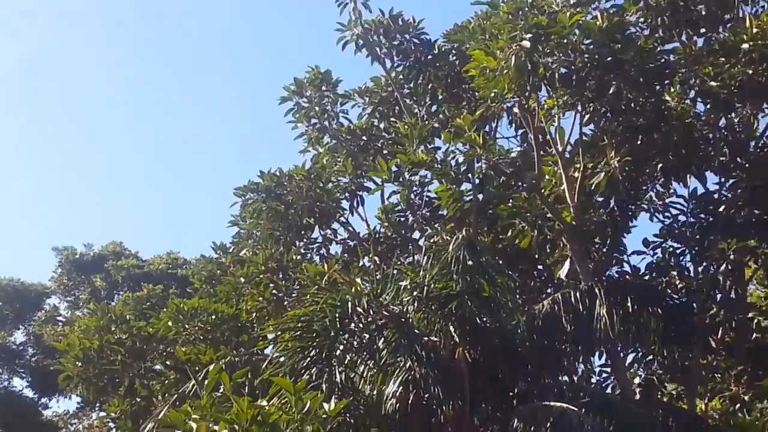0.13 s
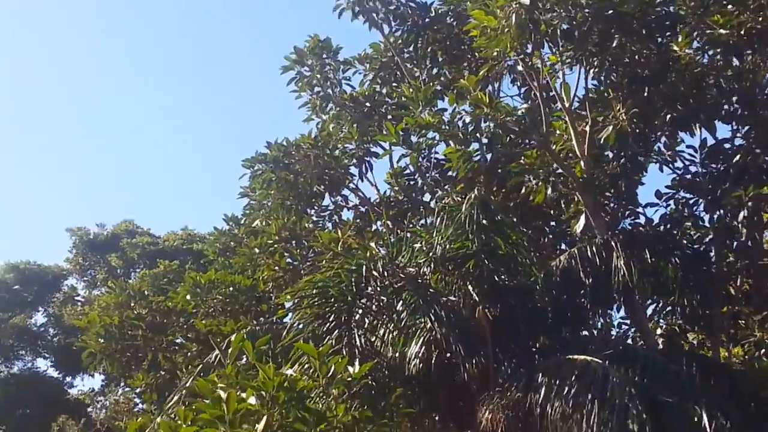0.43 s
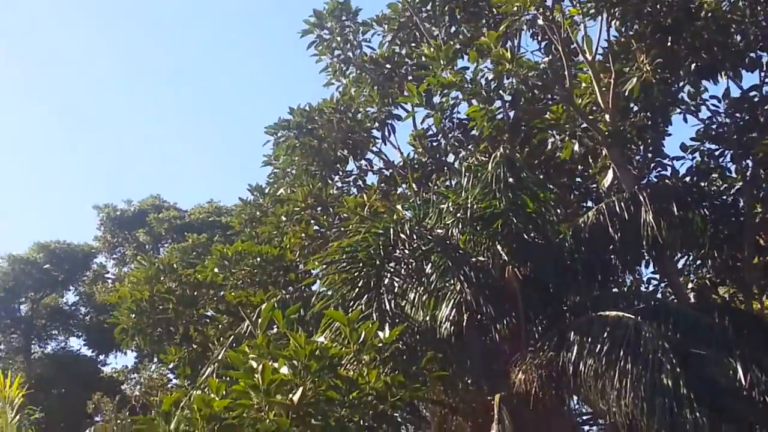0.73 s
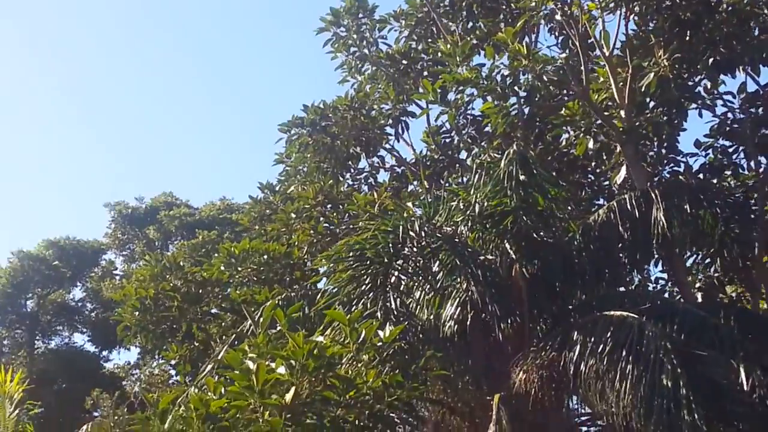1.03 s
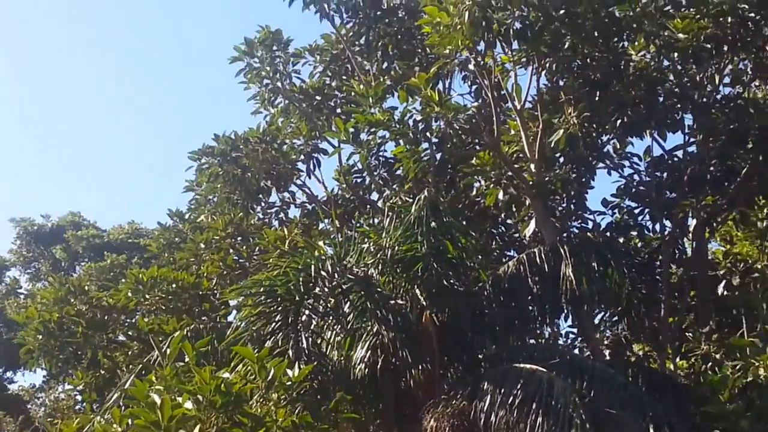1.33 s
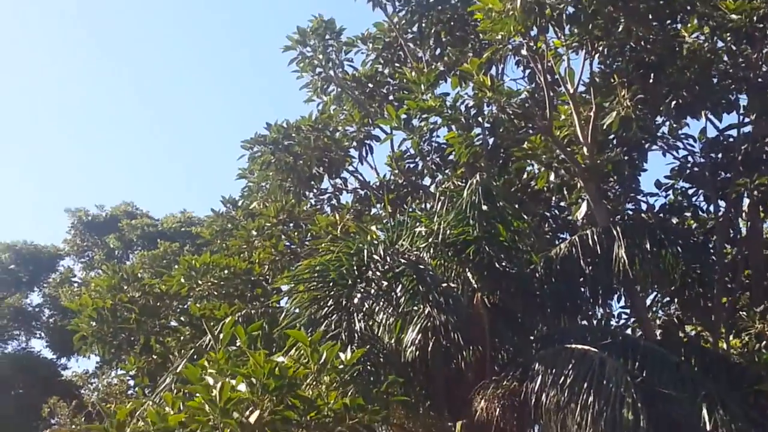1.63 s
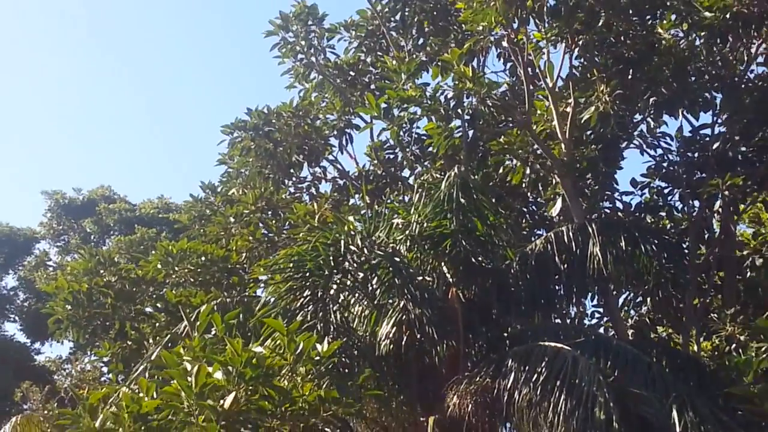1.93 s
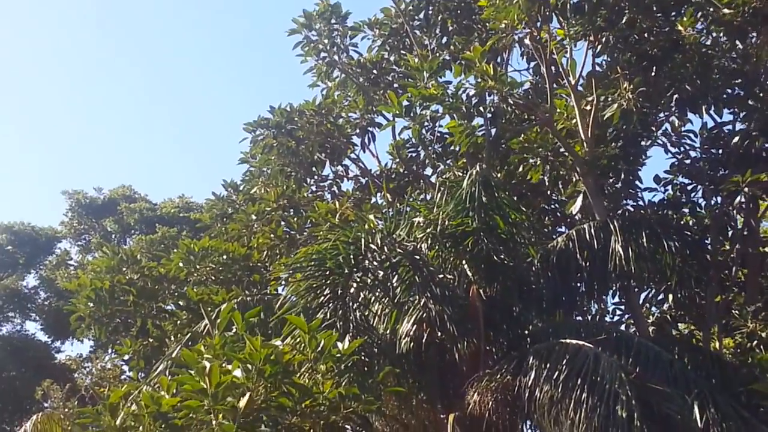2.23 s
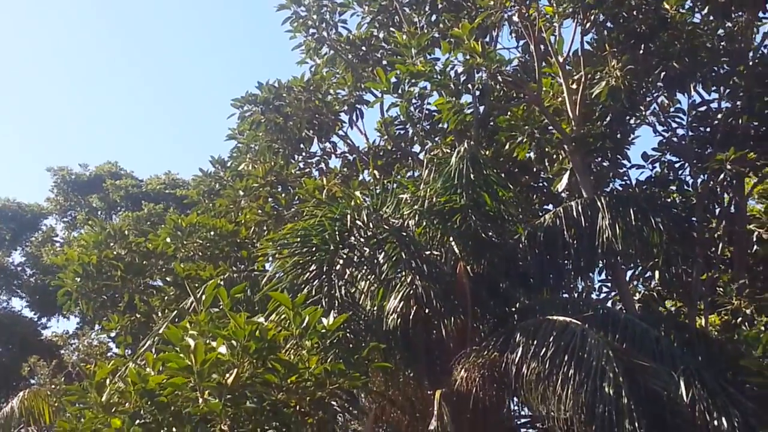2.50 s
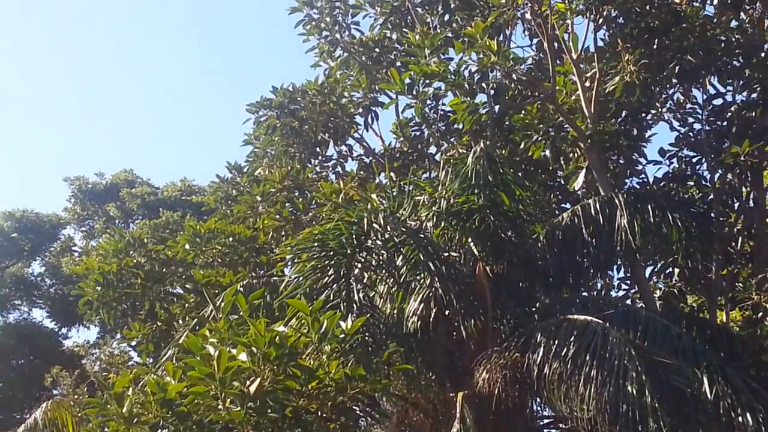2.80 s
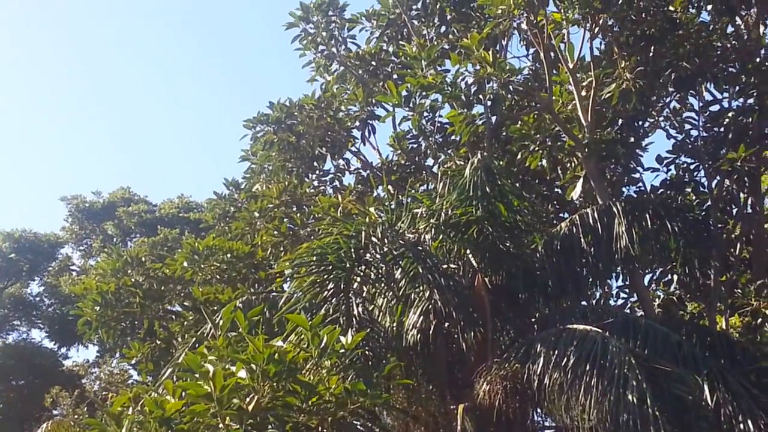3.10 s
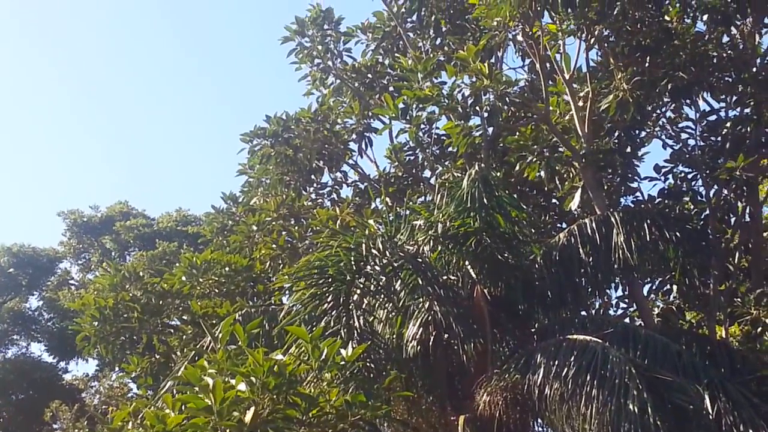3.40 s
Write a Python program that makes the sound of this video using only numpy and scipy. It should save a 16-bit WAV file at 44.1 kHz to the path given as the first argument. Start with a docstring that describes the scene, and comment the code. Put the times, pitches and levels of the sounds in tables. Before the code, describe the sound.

Loud rhythmic ape barks and near-pure low booms run throughout, with thin chirps and faint breaths between, soft hoots joining around one second; outdoor handheld microphone, leafy reverberation, steady background noise.

```python
"""Siamangs high in a forest canopy, over steady rumble and hiss (shaped noise) with a few low puffs of breeze.
At 0 s a throat-sac boom (near-pure tone) is already sounding and the first thin chirp (gliding sine) falls.
From 0.07 s bright arching barks (harmonic stacks), three a second, alternate with booms; a faint hiss of
drawn air (noise) precedes each, echoes and a tail (filtered copies, noise response) follow.
From 0.9 to 2 s a second ape adds soft gliding hoots and one deeper boom; barks and chirps run on to the end."""
import sys
import numpy as np
from scipy import signal
from scipy.fft import rfft, irfft
from scipy.io import wavfile
from scipy.ndimage import uniform_filter1d, minimum_filter1d, map_coordinates

SR = 44100
rng = np.random.default_rng(int(sys.argv[2]) if len(sys.argv) > 2 else 0)


def wav_out(sig):
    """Save sig, one row per channel (or a flat mono array), as 16-bit PCM at SR to the path in sys.argv[1]."""
    wavfile.write(sys.argv[1], SR, np.round(np.clip(np.atleast_2d(sig).T, -1, 1) * 32767).astype(np.int16))


N = 156555
T = np.arange(N) / SR

# background noise density: pitch_hz, relative_db_per_hz
FLOOR_SPECTRUM = [(25, -27), (55, -8.5), (110, -1), (220, -4.5), (450, -1), (950, -11.5), (1700, -9),
                  (3000, -19.5), (5000, -12.5), (7500, -27), (8900, -19), (10300, -66), (14500, -48)]
# background balance: pitch_hz, left_minus_right_db
FLOOR_BALANCE = [(60, -5.5), (1000, 2.5), (4000, 3), (8000, -22)]
FLOOR_DB, FLOOR_TOP_HZ = -30.5, 9800
FLOOR_FLICKER_DB, FLOOR_FLICKER_PER_S = 1.5, 14
# breeze puffs: centre_s, sigma_s, level_db
BREEZE_PUFFS = [(.41, 0.035, -31.5), (.535, 0.029, -23), (1.532, 0.058, -40), (1.85, 0.019, -32),
                (2.36, .03, -33.5), (2.77, 0.012, -34.5)]
# breeze noise: pitch_hz, relative_db
BREEZE_SPECTRUM = [(30, -33), (80, -4.5), (150, -4.5), (260, -11), (600, -38), (2000, -69)]

# forest tail: pitch_hz, level_db, t60_s
FOREST_TAIL = [(300, -22, 1), (417, -11, 1), (586, -2, 0.7), (1430, -10.5, 1), (2310, -7.5, 0.69),
               (4360, -2, 0.25), (7670, -5.5, 0.49), (9220, -8.5, 0.25), (13000, -13, 0.34)]
TAIL_BUILD_S, TAIL_START_S = .02, .012
# bark echoes from trunks and crowns: delay_s, left_db, right_db
TREE_ECHOES = [(.022, -43, 5), (.038, -19, -5), (.056, -10.5, -13.5), (.083, -24.5, -15)]
ECHO_CUT_HZ = 1130
ECHO_SHIFT_S, ECHO_SPREAD_DB = .006, 2.5  # the ape moves a little from bark to bark

# chirps: start_s, length_s, start_hz, middle_hz, end_hz, level_db
CHIRP_GLIDES = [(.0, 0.047, 2000, 1600, 1340, -33.5), (.112, .03, 1940, 1750, 1500, -36),
                (.218, 0.024, 2140, 1830, 1630, -28.5), (.340, 0.022, 2180, 1850, 1470, -30.5),
                (.558, 0.045, 1430, 1630, 1450, -33), (.580, 0.052, 1176, 870, 725, -32),
                (.662, .04, 1470, 1660, 1700, -37.5), (.768, .035, 2060, 1780, 1560, -35),
                (.845, 0.078, 1460, 1780, 1700, -33.5), (1.438, 0.024, 1580, 1740, 1580, -40),
                (1.875, 0.041, 1824, 1820, 1460, -30.5), (1.893, 0.023, 1110, 900, 696, -26.5),
                (2.090, 0.048, 1620, 1840, 1740, -27), (2.180, 0.06, 1536, 1880, 1650, -35),
                (2.398, 0.039, 1576, 1810, 1670, -30), (2.484, 0.042, 1585, 1860, 1520, -23.5),
                (2.815, 0.02, 1540, 1600, 1500, -42), (2.838, 0.037, 1305, 1000, 780, -27.5),
                (3.258, 0.051, 1620, 1880, 1520, -35), (3.410, 0.043, 2390, 1950, 1380, -32)]
# soft hoots: start_s, length_s, start_hz, middle_hz, end_hz, level_db
HOOT_GLIDES = [(.915, 0.12, 343, 396, 414, -22), (1.125, 0.2, 419.6, 375.7, 358, -22),
               (1.215, 0.094, 600, 547, 535, -37), (1.545, 0.11, 395, 437, 440, -31.5),
               (1.68, 0.12, 689, 563, 404, -25.5), (1.77, 0.18, 960, 958, 864, -37),
               (1.865, 0.11, 452, 417, 340, -33.5)]
GLIDE_WOBBLE_SHARE, GLIDE_FLICKER_DB, GLIDE_WOBBLE_PER_S = .012, 2, 150

# throat-sac booms: start_s, length_s, attack_s, lowest_hz, level_db
SAC_BOOMS = [(-.075, 0.16, .04, 325, -16), (0.208, 0.19, 0.045, 317.3, -13.5),
             (0.526, 0.18, 0.04, 317, -14.5), (0.806, 0.19, 0.11, 320.3, -9.5),
             (1.151, 0.15, 0.046, 321.4, -11.5), (1.348, 0.26, 0.058, 289, -9),
             (1.464, 0.14, 0.068, 324, -13), (1.766, .142, 0.042, 321.7, -9),
             (2.072, 0.15, 0.045, 321.7, -9.5), (2.404, .134, 0.029, 323.3, -9.5),
             (2.683, 0.16, 0.055, 320.6, -9.5), (3.018, 0.14, 0.029, 322, -10.5),
             (3.324, 0.13, 0.044, 324, -10.5)]
# boom overtones: multiple, relative_db
SAC_OVERTONES = [(2, -24), (4, -50.5)]
BOOM_BEND_SHARE, BOOM_LOWEST_AT_SHARE = 0.14, 0.33  # of pitch, of length
BOOM_RELEASE_S, BOOM_DROOP_DB = .048, 4
BOOM_WAVER_DB, BOOM_WAVER_PER_S = -1.35, 26
BOOM_LAG_S, BOOM_PAN_DB = .00022, -1  # lag: left phase is later

# drawn-air noise: pitch_hz, relative_db
INHALE_SPECTRUM = [(3000, -17), (4500, -74), (5400, 4.5), (6400, 2), (7700, 28), (8800, 11.5), (10000, -7),
                   (14000, -47)]
INHALE_DB, INHALE_LEAD_S, INHALE_SIGMA_S = -43, 0.024, 0.02
AIR_PAN_DB = -12.5  # inhales and rasp

# barks: start_s, length_s, top_hz, fundamental_db, second_harmonic_db, upper_harmonics_db,
#        bright_db (extra above 5 kHz, from the eighth harmonic)
BARK_CALLS = [(.073, 0.1, 740.8, -19, -11.5, 3, -1.5), (.388, 0.11, 723.7, -17, -12, -0.5, -1),
              (.700, 0.11, 730.8, -16.5, -13, 0, -2), (.998, 0.098, 728.6, -15.5, -13, 4.5, -0.5),
              (1.294, 0.083, 720.8, -18.5, -15.5, 3.5, -0.5), (1.603, .094, 715.3, -18.5, -13.5, 5, -2.5),
              (1.911, .102, 707.8, -17.5, -12.5, 1, -1.5), (2.237, .108, 716.4, -18.5, -12, 1.5, -0.5),
              (2.532, 0.097, 710.8, -16.5, -10, 7, -6.5), (2.847, 0.1, 728, -15.5, -10, 4, -1),
              (3.161, 0.094, 708, -16, -15, 5, -2.5), (3.448, 0.097, 704.4, -15, -16, 3.5, -4)]
# throat response to upper harmonics: pitch_hz, level_db, left_minus_right_db
THROAT_RESPONSE = [(2060, -22, -0.5), (2770, -31.5, -5), (3860, -25, -4), (4500, -23.5, 5.5),
                   (5140, -33, 7), (5930, -37, 4), (6880, -27.5, -15), (6620, -28, -2.5),
                   (7793, -33.5, -25.5), (8445, -26, -2), (9040, -47, -15.5), (12300, -54.5, -15),
                   (14200, -64.5, -2)]
# air noise within barks: pitch_hz, relative_db
RASP_SPECTRUM = [(1500, -60), (2400, 23.5), (3200, -5), (4400, 21), (5600, -3.5), (7400, 29.5), (8600, 11),
                 (9800, -4), (14000, -58)]
RASP_DB, RASP_RISE_DB = -30, 0.5  # rises over the bark, before the release
SCOOP_SHARE, SCOOP_S, SAG_SHARE, SAG_POWER = 0.1176, 0.00595, 0.2505, 4  # shares of top_hz
JITTER_SHARE, JITTER_PER_S = .006, 320
BARK_ATTACK_S, BARK_RELEASE_S, BARK_LAG_S = .016, .03, 0.000346  # lag: left phase is later
FUNDAMENTAL_PAN_DB, SECOND_PAN_DB, SECOND_FADE_DB = 0.5, 4, 4
UPPER_RISE_DB, UPPER_RISE_S = 10, 0.025  # upper harmonics come in a moment later
UPPER_FADE_DB, UPPER_FADE_POWER = 25.5, 2.53  # and fade as the pitch sags
HARMONIC_SPREAD_DB, HARMONIC_SPREAD_PER_S = 3, 45

CEILING_DB, LIMITER_S, CUTOFF_HZ = -.3, .012, 14600


def from_db(db):
    """Decibels to gain."""
    return 10 ** (np.asarray(db) / 20)


def rms_one(x):
    """Scale to unit power."""
    return x / np.sqrt(np.mean(x ** 2) + 1e-20)


def at_hz(points, hz, axis=1):
    """Read a table column on a log-frequency axis."""
    table = np.array(points)
    return np.interp(np.log(np.maximum(hz, 1)), np.log(table[:, 0]), table[:, axis])


def pan(db):
    """Left and right gains for a level difference."""
    return from_db(np.array([[.5], [-.5]]) * db)


def drift(rate_per_s, size):
    """Smooth random curve through unit-spread knots, rate_per_s of them a second."""
    knots = rng.standard_normal(size // 20 + 4)
    return map_coordinates(knots, [np.arange(size) * rate_per_s / SR], order=3, mode="wrap")


def coloured(spectrum):
    """Unit-power stereo noise with the given spectrum, unrelated left and right."""
    gain = from_db(at_hz(spectrum, np.fft.rfftfreq(N, 1 / SR)))
    return rms_one(irfft(rfft(rng.standard_normal((2, N))) * gain, N))


def bands(size):
    """Half-octave bands of stereo noise: centre_hz, noise."""
    white = rng.standard_normal((2, 2, size))  # two sources, so neighbouring bands are unrelated
    edges_hz = 22 * 2 ** np.arange(0, 9.6, .5)
    for k, (low_hz, high_hz) in enumerate(zip(edges_hz, edges_hz[1:])):
        band = signal.butter(2, [low_hz, high_hz], "band", fs=SR, output="sos")
        yield np.sqrt(low_hz * high_hz), signal.sosfilt(band, white[k % 2])


def swell(t, length_s, attack_s, release_s):
    """Rounded attack, hold and release."""
    rise = np.sin(np.pi / 2 * np.clip(t / attack_s, 0, 1)) ** 2
    return rise * np.sin(np.pi / 2 * np.clip((length_s - t) / release_s, 0, 1))


def lagged_phase(hz, lag_s):
    """Stereo phase of a varying pitch, the left side later."""
    return 2 * np.pi * (np.cumsum(hz) / SR - hz * lag_s * np.array([[1], [0]]))


def add(out, start_s, sound):
    """Mix a sound into out at a time."""
    i = int(start_s * SR)
    a, b = max(i, 0), min(i + sound.shape[-1], N)
    if b > a:
        out[:, a:b] += sound[..., a - i:b - i]


def background():
    """Distant rumble and leaf hiss as flickering noise bands, with low puffs of breeze."""
    floor = np.zeros((2, N))
    for hz, noise in bands(N):
        level_db = at_hz(FLOOR_SPECTRUM, hz) + FLOOR_FLICKER_DB * drift(FLOOR_FLICKER_PER_S, N)
        floor += noise * pan(at_hz(FLOOR_BALANCE, hz)) * from_db(level_db)
    floor = signal.sosfilt(signal.cheby1(10, 1, FLOOR_TOP_HZ, fs=SR, output="sos"), floor)
    breeze = sum(from_db(db) * np.exp(-.5 * ((T - s) / sigma_s) ** 2) for s, sigma_s, db in BREEZE_PUFFS)
    return from_db(FLOOR_DB) * rms_one(floor) + breeze * coloured(BREEZE_SPECTRUM)


def forest(x):
    """Scatter from leaves and trunks builds up and dies away, the treble mostly sooner."""
    t = np.arange(SR) / SR
    build = 1 - np.exp(-np.maximum(t - TAIL_START_S, 0) / TAIL_BUILD_S)
    response = np.zeros((2, SR))
    for hz, noise in bands(SR):
        shape = build * np.exp(-np.log(1000) * t / at_hz(FOREST_TAIL, hz, axis=2))
        response += noise * shape / np.sqrt(np.sum(shape ** 2)) * from_db(at_hz(FOREST_TAIL, hz))
    return signal.fftconvolve(x, response, axes=1)[:, :N]


def echoes(x):
    """Dull reflections from the nearest trees, on slightly different paths for each bark."""
    out = np.zeros((2, N))
    dull = signal.sosfilt(signal.butter(2, ECHO_CUT_HZ, fs=SR, output="sos"), x)
    for start_s, *_ in BARK_CALLS:
        i = int(start_s * SR)
        bark = dull[:, i:i + SR // 7]
        for delay_s, *sides_db in TREE_ECHOES:
            for side, db in enumerate(sides_db):
                arrival_s = start_s + delay_s + ECHO_SHIFT_S * rng.uniform(-0.986, 1)
                gain = from_db(db + ECHO_SPREAD_DB * rng.normal())
                add(out[side:side + 1], arrival_s, bark[side] * gain)
    return out


def glides(rows, pan_db):
    """Slightly unsteady sines that curve through three pitches."""
    out = np.zeros((2, N))
    for start_s, length_s, start_hz, middle_hz, end_hz, db in rows:
        u = np.linspace(0, 1, int(length_s * SR))
        curve_hz = np.polyval(np.polyfit([0, .5, 1], [start_hz, middle_hz, end_hz], 2), u)
        hz = curve_hz * (1 + GLIDE_WOBBLE_SHARE * drift(GLIDE_WOBBLE_PER_S, len(u)))
        level = from_db(db + GLIDE_FLICKER_DB * drift(GLIDE_WOBBLE_PER_S, len(u)))
        tone = np.sin(2 * np.pi * np.cumsum(hz) / SR)
        add(out, start_s, np.sqrt(2) * level * np.sin(np.pi * u) * tone)
    return out * pan(pan_db)


def chirps():
    """Thin, brief gliding tones."""
    return glides(CHIRP_GLIDES, pan_db=4.5)


def hoots():
    """The second ape's soft gliding tones."""
    return glides(HOOT_GLIDES, pan_db=3.5)


def booms():
    """The throat sac sounds an almost pure tone that dips slightly, then bends up as it ends."""
    out = np.zeros((2, N))
    for start_s, length_s, attack_s, lowest_hz, db in SAC_BOOMS:
        t = np.arange(int(length_s * SR)) / SR
        u = t / length_s
        hz = lowest_hz * (1 + BOOM_BEND_SHARE * (u - BOOM_LOWEST_AT_SHARE) ** 2)
        phase = lagged_phase(hz, BOOM_LAG_S)
        tone = np.sin(phase) + sum(from_db(part_db) * np.sin(k * phase) for k, part_db in SAC_OVERTONES)
        level_db = db - BOOM_DROOP_DB * u ** 2 + BOOM_WAVER_DB * drift(BOOM_WAVER_PER_S, len(t))
        envelope = swell(t, length_s, attack_s, BOOM_RELEASE_S)
        add(out, start_s, np.sqrt(2) * tone * from_db(level_db) * envelope)
    return out * pan(BOOM_PAN_DB)


def inhales():
    """Air drawn in just before each bark: a faint swell of hiss."""
    flow = sum(np.exp(-.5 * ((T - row[0] + INHALE_LEAD_S) / INHALE_SIGMA_S) ** 2) for row in BARK_CALLS)
    return flow * from_db(INHALE_DB) * pan(AIR_PAN_DB) * coloured(INHALE_SPECTRUM)


def barks():
    """Pitch scoops up to its top and sags; the throat shapes the harmonics, with a little air noise."""
    out, air = np.zeros((2, N)), np.zeros((2, N))
    t = np.arange(SR // 7) / SR
    rise_db = -UPPER_RISE_DB * np.exp(-t / UPPER_RISE_S)
    for start_s, length_s, top_hz, first_db, second_db, upper_db, bright_db in BARK_CALLS:
        u = np.minimum(t / length_s, 1)
        scoop = SCOOP_SHARE * np.exp(-t / SCOOP_S)
        sag = SAG_SHARE * u ** SAG_POWER
        hz = top_hz * (1 - scoop - sag + JITTER_SHARE * drift(JITTER_PER_S, len(t)))
        phase = lagged_phase(hz, BARK_LAG_S)
        envelope = swell(t, length_s, BARK_ATTACK_S, BARK_RELEASE_S)
        voice = from_db(first_db) * pan(FUNDAMENTAL_PAN_DB) * np.sin(phase)
        voice += from_db(second_db - SECOND_FADE_DB * u ** 2) * pan(SECOND_PAN_DB) * np.sin(2 * phase)
        effort_db = upper_db + rise_db - UPPER_FADE_DB * u ** UPPER_FADE_POWER
        for k in range(3, 21):
            level_db = at_hz(THROAT_RESPONSE, k * top_hz) + effort_db + bright_db * (k > 7)
            sides = np.array([drift(HARMONIC_SPREAD_PER_S, len(t)) for _ in range(2)])
            gain = from_db(level_db + HARMONIC_SPREAD_DB * sides)
            balance = pan(at_hz(THROAT_RESPONSE, k * top_hz, axis=2))
            voice += gain * balance * np.sin(k * phase + 2 * np.pi * rng.random((2, 1)))
        add(out, start_s, np.sqrt(2) * envelope * voice)
        add(air, start_s, envelope * from_db(upper_db + bright_db + rise_db + RASP_RISE_DB * u ** 2))
    return out + air * from_db(RASP_DB) * pan(AIR_PAN_DB) * coloured(RASP_SPECTRUM)


def scene():
    """All callers in the forest, over the background; only barks get discrete echoes."""
    barking = barks()
    calls = barking + inhales() + booms() + hoots() + chirps()
    return background() + forest(calls) + echoes(barking) + calls


def record(dry):
    """A limiter holds the loudest peaks, then the top is cut."""
    size = 2 * int(LIMITER_S * SR / 2) + 1
    gain = np.minimum(1, from_db(CEILING_DB) / (np.abs(dry).max(axis=0) + 1e-9))
    held = dry * uniform_filter1d(minimum_filter1d(gain, size), size)
    return signal.sosfilt(signal.ellip(10, .2, 80, CUTOFF_HZ, fs=SR, output="sos"), held)


dry = scene()
out = record(dry)
wav_out(out)
```